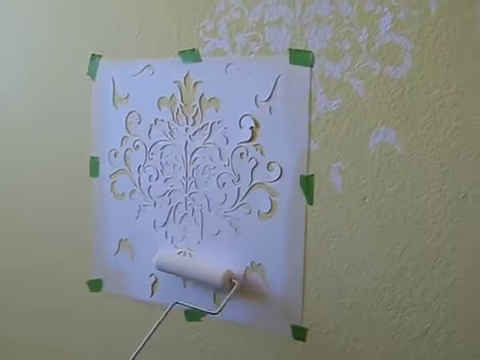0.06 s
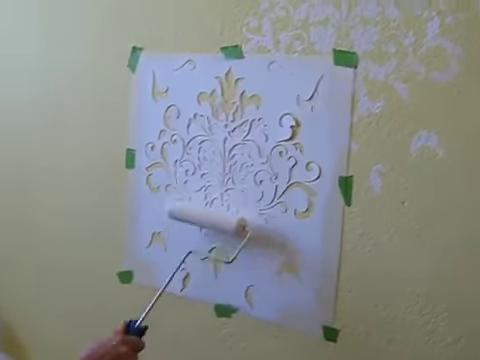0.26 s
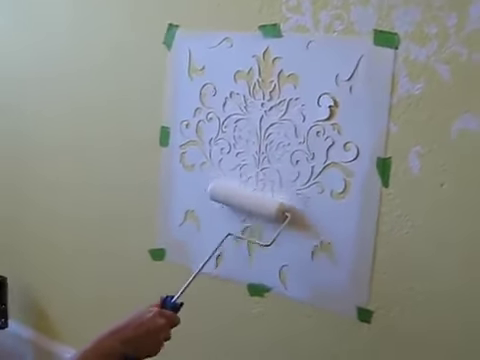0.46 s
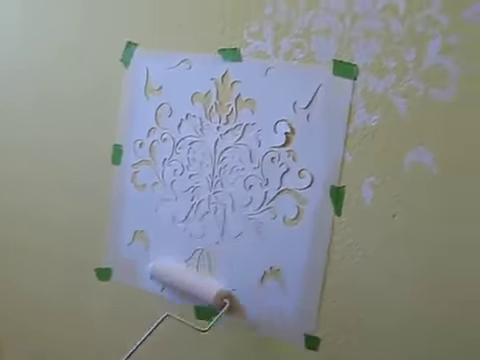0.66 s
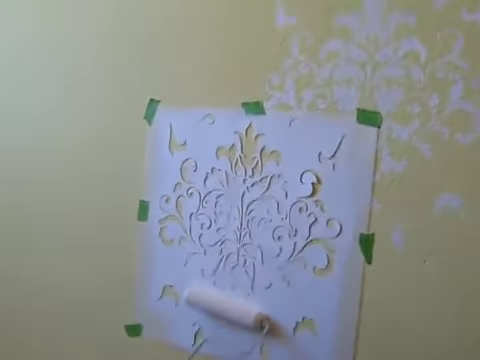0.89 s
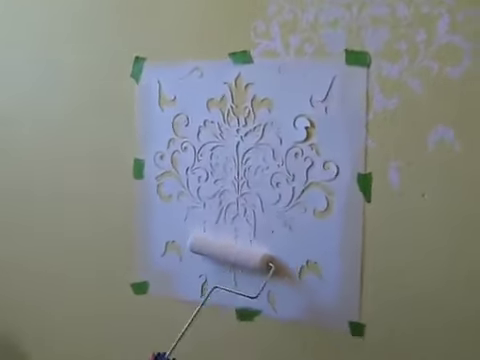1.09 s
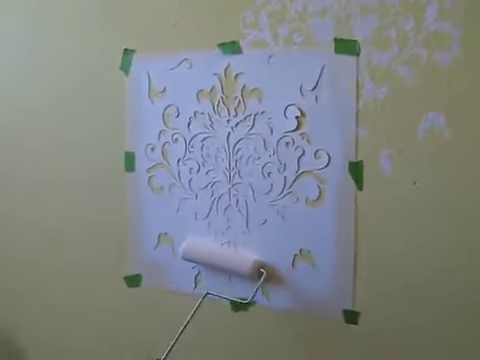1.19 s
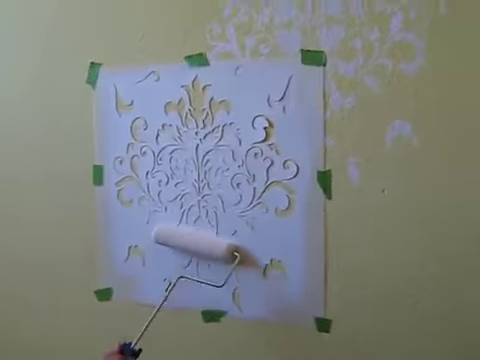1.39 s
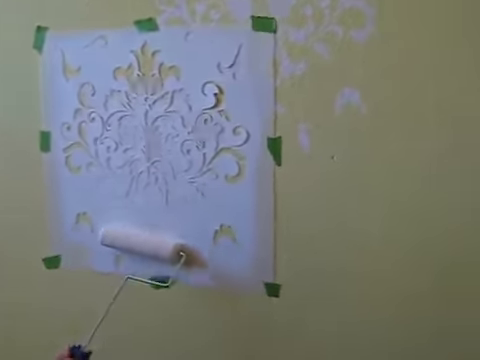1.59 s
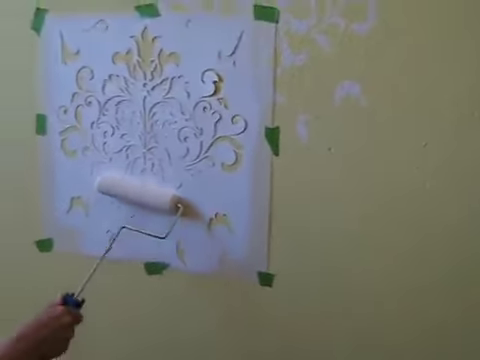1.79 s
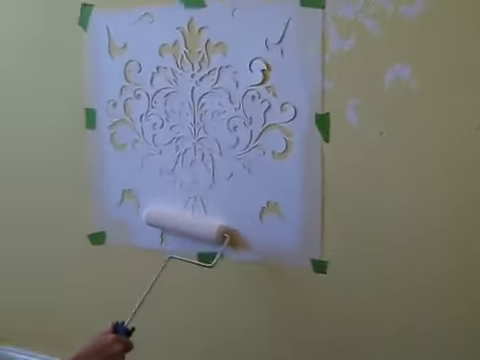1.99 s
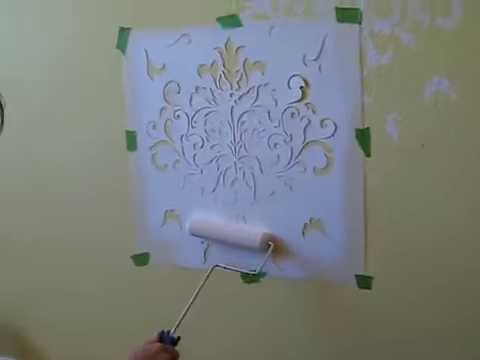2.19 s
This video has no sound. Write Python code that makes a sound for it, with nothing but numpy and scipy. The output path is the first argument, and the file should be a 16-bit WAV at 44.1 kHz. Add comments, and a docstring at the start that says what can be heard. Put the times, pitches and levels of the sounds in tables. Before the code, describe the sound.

A small paint roller rolls over a plastic stencil on a wall with a fine wet hiss. After a short pause, the sheet snaps sharply at 0.2 seconds, and soft bumps follow between 0.4 and 0.7. Quick hissing strokes swell and fade from 0.5 to about 2.1 seconds. The sheet rasps louder from 1.6 and snaps again around 1.9. Faint room rumble and electrical hum lie underneath.

```python
"""A fine bright hiss swells and fades, stroke by stroke, as a small foam roller runs up and down over a plastic
stencil taped to the wall of a bare room. The hiss is wet paint tearing behind the roller. The sheet rasps as it
slips and snaps where it lifts off the wall, and a hand thuds softly against the wall. A small mono microphone,
with a ring near 3.7 kHz, hears it over room rumble and a faint mains hum."""
import sys
import numpy as np
from scipy import signal
from scipy.fft import rfft, irfft
from scipy.io import wavfile

SR = 44100
rng = np.random.default_rng(int(sys.argv[2]) if len(sys.argv) > 2 else 0)


def pcm_store(signal):
    """Save signal as 16-bit PCM."""
    levels = np.round(np.clip(np.atleast_2d(signal), -1, 1) * 32767)
    wavfile.write(sys.argv[1], SR, levels.astype(np.int16).T)


N = 97020


def from_db(db):
    """Amplitude ratio of a level in decibels."""
    return 10 ** (np.asarray(db) / 20)


def rms_one(x):
    """Normalisation to an rms of 1."""
    return x / np.sqrt(np.mean(x ** 2) + 1e-20)


def drift(corner_hz):
    """Low-pass filtered noise gives a slow random fluctuation; rms 1."""
    pole = np.exp(-2 * np.pi * corner_hz / SR)
    return rms_one(signal.lfilter([1], [1, -2 * pole, pole * pole], rng.standard_normal(N + SR))[SR:])


def coloured(x, spectrum):
    """Spectral shaping by levels interpolated over log frequency; rms 1."""
    hz, db = np.transpose(spectrum)
    log_hz = np.log(np.maximum(np.arange(N // 2 + 1) * SR / N, 1))
    gain = from_db(np.interp(log_hz, np.log(hz), db))
    return rms_one(irfft(rfft(x) * gain, N))


def impulses(per_s, spread_db=0):
    """A Poisson process: independent clicks of random sign, their levels scattered by spread_db."""
    sizes = from_db(spread_db * np.minimum(rng.exponential(1, N), 5)) * rng.choice([-1, 1], N)
    return sizes * (rng.random(N) < per_s / SR) + 1e-18


def resonant(x, peaks):
    """Forced response of parallel resonators of alternating polarity; rms 1."""
    out = 0
    for k, (hz, width_hz, db) in enumerate(peaks):
        radius = np.exp(-np.pi * width_hz / SR)
        gain = (1 - radius ** 2) / 2
        feedback = [1, -2 * radius * np.cos(2 * np.pi * hz / SR), radius ** 2]
        out = out + (-1) ** k * from_db(db) * signal.lfilter([gain, 0, -gain], feedback, x)
    return rms_one(out)


def ring(push, hz, t60_s):
    """A damped oscillator: each impulse starts an exponentially decaying sine."""
    radius, angle = from_db(-60 / (t60_s * SR)), 2 * np.pi * hz / SR
    return signal.lfilter([0, np.sin(angle)], [1, -2 * radius * np.cos(angle), radius ** 2], push)


def room_tone():
    """The noise floor: broadband rumble and microphone hiss, plus a wavering tone of mains hum."""
    # spectrum of the noise: frequency_hz, relative_db
    floor_spectrum = [(12, -38), (20, -2), (235, -1.5), (774, -3), (1140, -2.5), (1550, -8), (2480, -12),
                      (3270, -10), (3650, -7.5), (3970, -13), (7930, -16.5), (13800, -20.5), (15000, -17)]
    floor_db, hum_hz, hum_db, waver_db = -51, 100, -67.5, 4.5
    hum_rms = from_db(hum_db + waver_db * drift(corner_hz=3.9))
    hum = hum_rms * np.sqrt(2) * np.sin(2 * np.pi * hum_hz * np.arange(N) / SR)
    return from_db(floor_db) * coloured(rng.standard_normal(N), floor_spectrum) + hum


def hand_thuds():
    """Impact excitation: each soft push of the hand rings one low mode of the wall."""
    # bumps on the wall: start_s, pitch_hz, level_db, t60_s
    bumps = [(.40, 121, -49.5, 0.096), (.44, 82, -46, 0.19), (.615, 550, -42.5, 0.027),
             (.665, 707, -44.5, 0.064)]
    out = 0
    for start_s, pitch_hz, level_db, t60_s in bumps:
        push = np.full(N, 1e-18)
        push[int(start_s * SR)] = from_db(level_db)
        mode = ring(push, pitch_hz, t60_s)
        softened = resonant(mode, [(pitch_hz, pitch_hz / 2, 0)])   # the band-pass rounds the attack
        out = out + softened * np.sqrt(np.mean(mode ** 2))
    return out


def sheet_rasp():
    """Stick-slip friction: dense slips of the sheet on the wall drive three groups of resonances."""
    # envelope of each group: time_s, low_db, high_db, top_db
    envelopes = [(.1, -78, -75, -68), (.39, -71, -75, -82), (.42, -46, -64, -66), (.5, -70, -63, -62),
                 (.6, -60.5, -58, -68), (.64, -54.5, -48, -57), (.66, -51, -50.5, -55),
                 (0.679, -43.5, -41.5, -46), (0.699, -56, -52, -57), (.77, -58, -56.5, -62),
                 (.99, -50.5, -52.5, -67), (1.04, -60, -48.5, -54), (1.11, -66, -49, -47),
                 (1.22, -56, -53, -59), (1.27, -69, -68, -71), (1.35, -55, -53.5, -58),
                 (1.375, -59, -47.5, -54), (1.46, -57, -50.5, -60), (1.57, -57.5, -55, -62),
                 (1.6, -43.5, -46, -55), (1.69, -43, -48, -66), (1.755, -35.5, -37, -60),
                 (1.8, -43, -48.5, -61), (1.819, -39.5, -44.5, -52), (1.85, -51, -52.5, -62),
                 (1.868, -40, -40.5, -59), (1.887, -32.5, -35, -53), (1.899, -48, -44, -55),
                 (1.914, -22.5, -31.5, -50), (1.916, -58, -61, -58), (1.939, -36, -47, -71),
                 (1.97, -61.5, -51, -58.5), (2.04, -46.5, -55, -58), (2.08, -59, -67, -72),
                 (2.2, -58, -56, -65)]
    # resonances heard in the rasp, by group: centre_hz, width_hz, relative_db
    low_peaks = [(1284, 300, 3.5), (1795, 290, 1), (2330, 570, -4), (2990, 280, -8.5)]
    high_peaks = [(3290, 410, 4.5), (3830, 230, 3.5), (4190, 370, -1)]   # the microphone's ring near 3.7 kHz
    top_peaks = [(4460, 710, 5.5), (5290, 910, 3.5)]
    # band of slip noise that drives each group, same columns
    bands = [(1930, 1550, 0), (3900, 930, 0), (5100, 3400, 0)]
    slips = impulses(per_s=2500, spread_db=1.5)
    time_s, *levels_db = np.transpose(envelopes)
    out = 0
    for level_db, band, peaks in zip(levels_db, bands, [low_peaks, high_peaks, top_peaks]):
        envelope = from_db(np.interp(np.arange(N) / SR, time_s, level_db))
        out = out + envelope * resonant(resonant(slips, [band]), peaks)
    return out


def sheet_snaps():
    """Free vibration: a click and a crackle ring sheet and microphone; the sheet rustles to rest."""
    # snaps, all levels relative: start_s, level_db, low_db, upper_db, treble_db, length_s, rustle_db
    snaps = [(.2367, -4, -20, 0.5, -2, 0.0011, -3.5), (0.276, -24, -25, -10, -16, 0.0011, 1),
             (.3752, -32.5, -1, -12, -19, 0.0026, -6), (0.401, -44, -12, 3, 5, 0.0011, -6),
             (0.4026, -33, 16, -1, 5, 0.006, 0), (0.418, -40, 10, -3, -22, 0.0015, -5),
             (1.8865, -7, 0, -9.5, -20, 0.00081, -11), (1.9, -19, 4, -11, -10, 0.0028, -10),
             (1.9285, -17.5, 2, -15, -6.5, 0.0028, -13), (1.943, -41, 14, -8, -12, 0.0023, -11),
             (1.983, -34, 7, -5, -11, 0.0008, -11)]
    # low, middle (the microphone's ring), upper and treble resonances: pitch_hz, relative_db, t60_s
    resonances = [
        [(824, -10, 0.0059), (1620, -4, 0.0039), (2320, -4, 0.0023), (2830, -1, 0.0031)],
        [(3540, 3, 0.0092), (3830, 4, 0.015), (4080, 3.5, 0.0032)],
        [(4500, 12, 0.0024), (5180, 6.5, 0.0054), (5050, 2.5, 0.0089), (6700, -1, 0.0036)],
        [(8860, 2, 0.0025), (10250, -1, 0.0092), (11800, -4.5, 0.0032), (13230, 11, 0.0023), (13800, 1, .002)],
    ]
    # delay of each range behind the treble: lag_s
    lag_s = [.0005, .0004, .0004, 0]
    tail_t60_s, tail_db = [0.065, 0.18, 0.18, 0.25], [-48, -33, -35, -39.5]   # rustle in each range
    burst_t, tail_t = np.arange(500) / SR, np.arange(SR // 2) / SR
    trim_db, rustle_gap_s = -8, 0.0029
    click = 8 * (burst_t == 0)
    crackles = rng.standard_normal((len(snaps), len(burst_t)))
    out = 0
    for part, modes in enumerate(resonances):
        push = np.full((2, N + SR), 1e-18)   # one row drives the snap, the other its rustle
        for snap, crackle in zip(snaps, crackles):
            start_s, level_db, low_db, upper_db, treble_db, length_s, rustle_db = snap
            burst = (click + crackle) * np.exp(-2 * burst_t / length_s)
            range_db = (low_db, 0, upper_db, treble_db)[part]
            burst *= from_db(level_db + range_db + trim_db) / np.sqrt(np.sum(burst ** 2))
            onset = int((start_s + lag_s[part]) * SR)
            push[:, onset:onset + len(burst)] += burst * from_db([[0], [rustle_db]])
        crack, settling = sum((-1) ** k * from_db(db) * ring(push[:, :N], hz, t60_s)
                              for k, (hz, db, t60_s) in enumerate(modes))
        decay = from_db(tail_db[part] - 60 * tail_t / tail_t60_s[part]) * (tail_t > rustle_gap_s)
        rustle = signal.fftconvolve(settling, decay * rng.standard_normal(len(tail_t)))[:N]
        out = out + crack + rustle
    return signal.sosfilt(signal.butter(3, 550, "high", fs=SR, output="sos"), out)


def paint_hiss():
    """Shot noise: countless paint threads tear behind the roller, louder as its speed rises."""
    # strokes of the roller: start_s, fastest_s, end_s, relative_db
    strokes = [(-.2, -.05, 0.079, -45.5), (.40, 0.398, .47, -52), (0.465, 0.572, 0.683, -42),
               (0.6, 0.687, 0.81, -47), (0.73, .98, 1.1, -45.5), (1.049, 1.135, 1.292, -44),
               (1.24, 1.42, 1.46, -44), (1.455, 1.57, 1.658, -42.5), (1.618, 1.8, 1.845, -43),
               (1.824, 1.948, 2.09, -42), (2.115, 2.253, 2.34, -54.5)]
    # spectrum of tearing paint: frequency_hz, relative_db
    tear_spectrum = [(880, -46), (1500, -19), (2430, -7), (3600, -5), (6300, -1), (7210, -4), (7790, -1),
                     (8410, -6), (9360, -2.5), (14300, -1.5), (15000, -3)]
    speed_exponent, gain_db, flutter_db = 1.18, 4, 0.54
    t, power = np.arange(N) / SR, 0
    for start_s, fastest_s, end_s, relative_db in strokes:
        speed = np.sin(np.interp(t, [start_s, fastest_s, end_s], [0, np.pi / 2, np.pi]))
        amplitude = from_db(relative_db) * np.abs(speed) ** speed_exponent
        power = power + amplitude ** 2   # incoherent sounds add in power
    envelope = np.sqrt(power) * from_db(gain_db + flutter_db * drift(corner_hz=23))
    return envelope * coloured(impulses(per_s=9000), tear_spectrum)


def scene():
    """Superposition: all sources add at one microphone, alike in both channels."""
    return np.tile(room_tone() + hand_thuds() + sheet_rasp() + sheet_snaps() + paint_hiss(), (2, 1))


def record(dry):
    """Soft saturation rounds the peaks; a deep notch and a steep low-pass then filter the treble."""
    ceiling, notch_hz, notch_width_hz, cutoff_hz = 0.61, 7850, 564, 15050
    sound = ceiling * np.tanh(dry / ceiling)
    notch = signal.iirnotch(notch_hz, notch_hz / notch_width_hz, fs=SR)
    for _ in range(3):   # each pass widens the notch
        sound = signal.lfilter(*notch, sound)
    return signal.sosfilt(signal.ellip(14, 0.5, 70, cutoff_hz, fs=SR, output="sos"), sound)


dry = scene()
out = record(dry)
pcm_store(out)
```